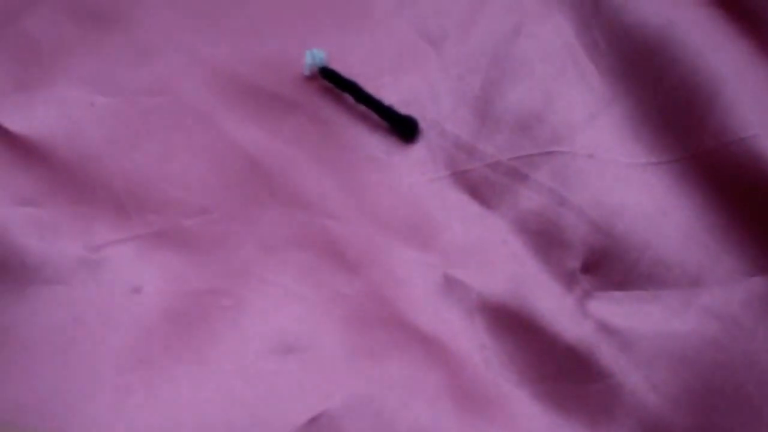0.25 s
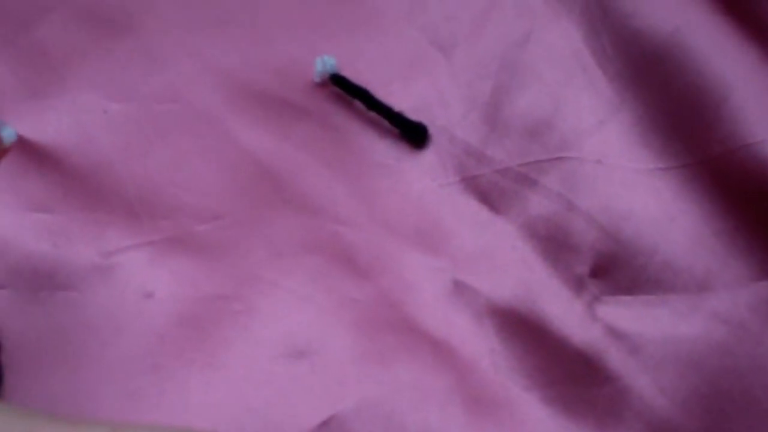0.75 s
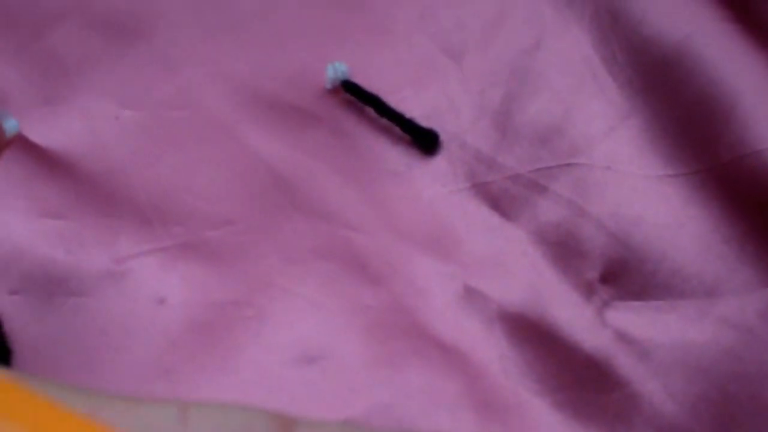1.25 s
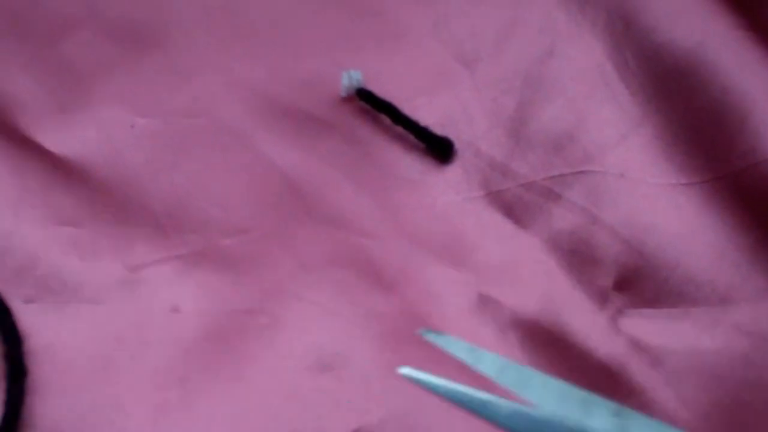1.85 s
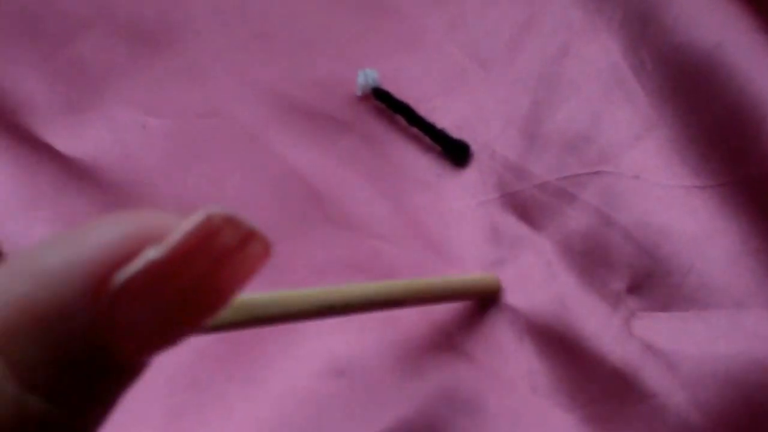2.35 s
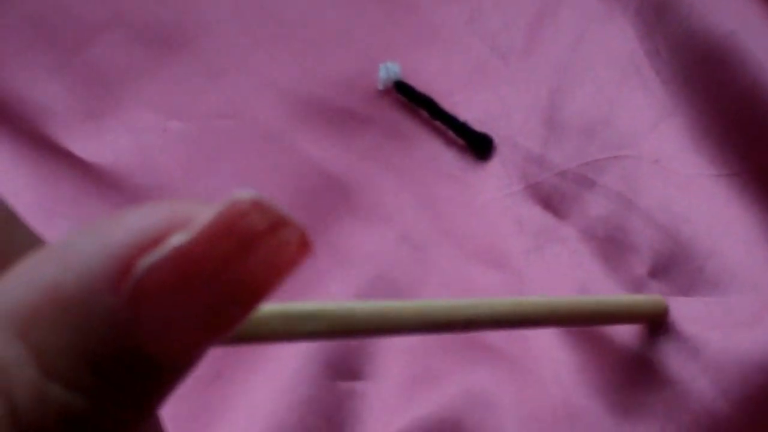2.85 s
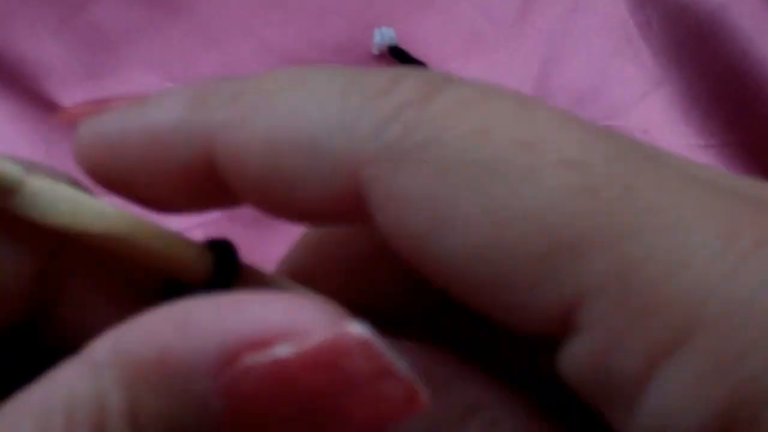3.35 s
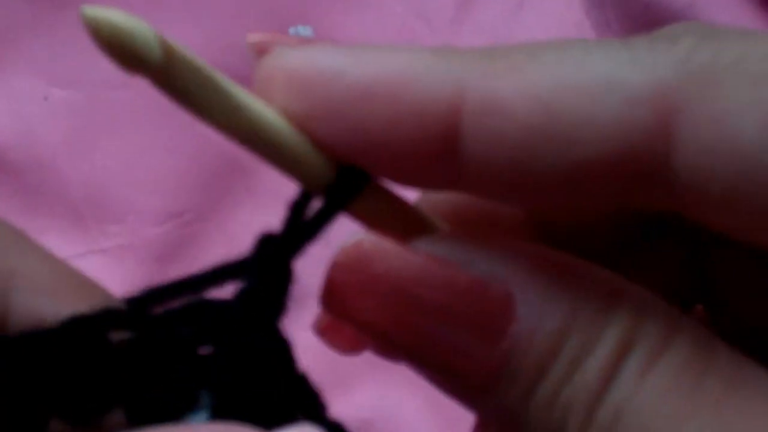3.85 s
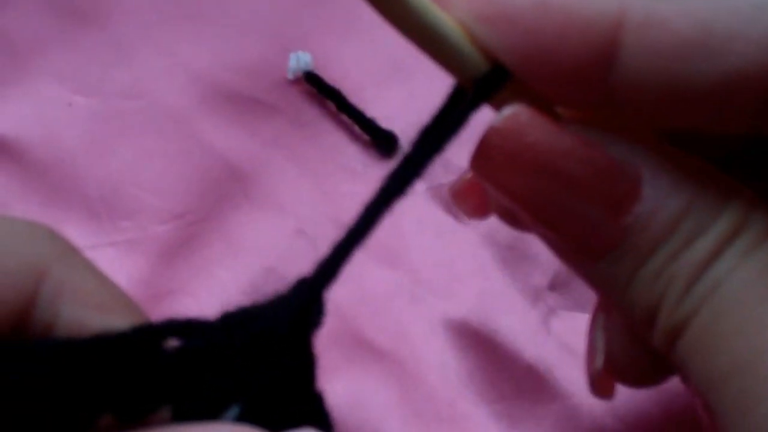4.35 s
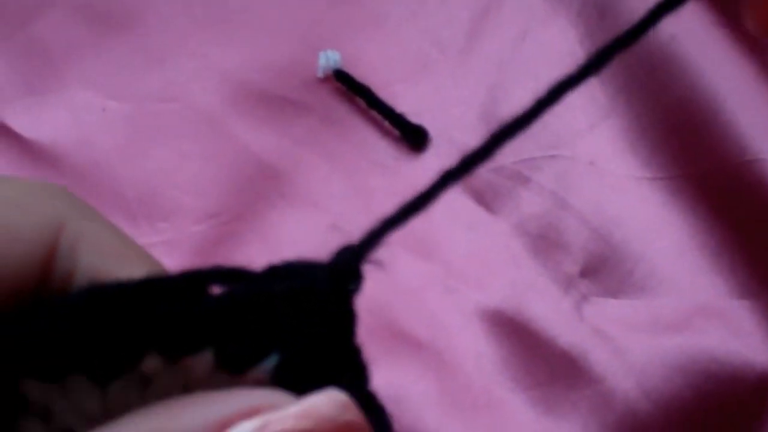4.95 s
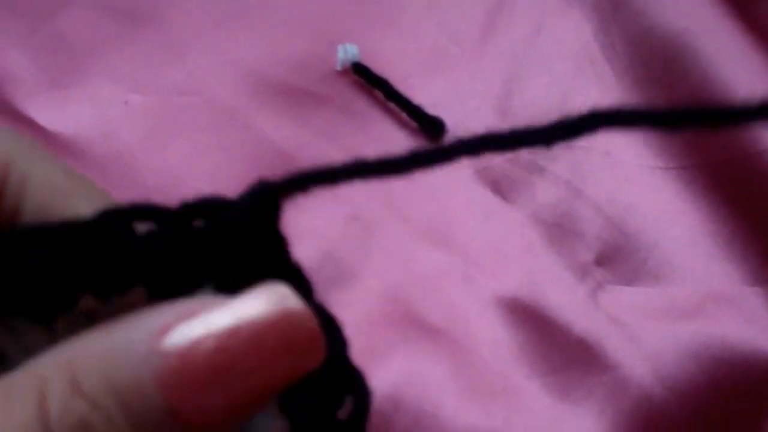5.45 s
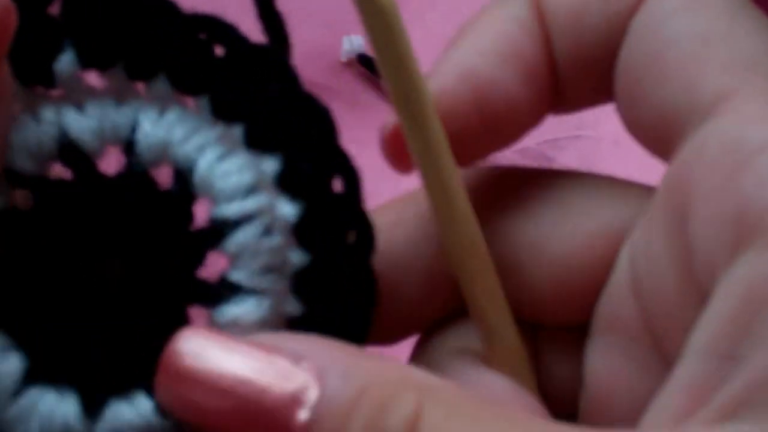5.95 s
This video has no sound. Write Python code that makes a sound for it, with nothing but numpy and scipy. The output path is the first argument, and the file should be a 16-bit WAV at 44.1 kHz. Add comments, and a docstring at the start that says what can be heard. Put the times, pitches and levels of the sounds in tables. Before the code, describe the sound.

Crisp close snips and a brief metallic scrape, followed by light wooden and fingernail ticks, soft yarn rustling, and a faint distant machine hum.

```python
"""Scissors, yarn and a wooden hook

Small scissors click, scrape and snip yarn close to two microphones, then a hook and fingernails tick: decaying
modes excited by contact noise. Soft noise swells in patches: hands and yarn on cloth, and room tails of snips.
A far machine hums in the room: filtered noise with fuzzy lines, under the hiss of the microphones.
The left microphone is half covered and much weaker."""
import sys
import numpy as np
from scipy import signal
from scipy.fft import rfft, irfft
from scipy.io import wavfile
from scipy.ndimage import uniform_filter1d

SR = 44100
rng = np.random.default_rng(int(sys.argv[2]) if len(sys.argv) > 2 else 0)


def file_out(sig):
    """Save sig as 16-bit WAV at sys.argv[1]."""
    # one column per channel
    cols = np.atleast_2d(sig).T
    # limit, then scale
    lim = np.clip(cols, -1, 1)
    pcm = np.round(lim * 32767).astype(np.int16)
    wavfile.write(sys.argv[1], SR, pcm)


N = 273420  # length in samples


def gain_of(db):
    """Level definition: an amplitude factor of ten is 20 dB."""
    return 10 ** (np.asarray(db) / 20)


def evened(x):
    """Normalisation to unit RMS."""
    return x / np.sqrt(np.mean(x ** 2) + 1e-20)


def read(points, hz):
    """Interpolation of a curve along logarithmic frequency."""
    f, value = np.transpose(points)
    return np.interp(np.log(hz + 1), np.log(f + 1), value)


def add(mix, s, sound):
    """Superposition: a sound joins the mix from time s, cut at the end."""
    part = mix[round(s * SR):][:len(sound)]
    part += sound[:len(part)]


def coloured(x, points, lead_s=0):
    """Linear filtering: a spectrum in dB scales each frequency; a linear phase gives a time lead."""
    hz = np.fft.rfftfreq(x.shape[-1], 1 / SR)
    response = gain_of(read(points, hz)) * np.exp(2j * np.pi * hz * lead_s)
    return irfft(rfft(x) * response, x.shape[-1])


# swells of soft noise: brushes over cloth, and the room's tail after snips at .25, .46 and .87 s:
# (loudest [s], rise [s], fall [s], level [dB], brightness [dB per octave])
SWELLS = [(.25, .04, 0.14, -61, -2), (.46, .04, 0.074, -60.5, 0), (.63, 0.09, 0.11, -64.5, -3.5),
          (.87, 0.054, 0.066, -62, 5.5), (1.35, 0.25, 0.051, -63.5, -3.5), (1.5, 0.037, 0.062, -73, -3),
          (1.64, 0.066, 0.14, -64, 5.5), (1.81, .1, 0.059, -58.5, 0), (1.88, .03, 0.027, -61, 2),
          (2.141, 0.15, 0.093, -56.5, 0), (2.3, 0.11, 0.12, -69.5, -2.5), (2.42, 0.055, 0.13, -54.5, -1),
          (2.53, .06, 0.09, -53, -1.2), (2.71, 0.15, 0.061, -58.5, 0), (2.9, 0.11, 0.14, -56, -1),
          (3.41, 0.098, 0.1, -60, 1.5), (3.67, 0.11, 0.24, -67.5, .8), (4.17, .2, 0.18, -65.5, -1),
          (4.43, 0.043, .1, -60, 1), (4.58, 0.099, 0.11, -57, -0.5), (5.38, 0.13, 0.046, -61.5, 2.5),
          (5.57, 0.12, 0.32, -67.5, 0), (5.85, 0.082, 0.11, -61.5, -0.5), (6.04, .07, 0.12, -61.5, 2),
          (6.2, 0.066, .05, -58, 2)]
REST_DB, REST_TILT_DB = -73.5, -1.5  # faint rustle between swells: level, brightness per octave


def swelling(t):
    """Linear envelopes superpose; brightness is the level-weighted mean of the swells sounding."""
    s, rise, fall, db, tilt = np.transpose(SWELLS)[:, :, None]
    triangle = np.minimum(1 + (t - s) / rise, 1 - (t - s) / fall)
    swell = gain_of(db) * np.clip(triangle, 0, 1)
    level = gain_of(REST_DB) + swell.sum(0)
    tilt_sum = gain_of(REST_DB) * REST_TILT_DB + (swell * tilt).sum(0)
    return level, tilt_sum / level


# relative spectrum of the rustle, closed above 14.2 kHz: (frequency [Hz], density [dB per Hz])
RUSTLE_SPECTRUM = [(470, -38), (800, 0.5), (1300, -2), (2100, 0), (4000, -0.5), (6000, -1), (9000, 0),
                   (13500, 5.5), (14200, 8), (14400, -46)]
PATCH_DB, FLICKER_DB = 2.44, 2.1  # RMS unevenness over time and frequency; over time alone


def rustle():
    """Modulated noise: patches and brief flickers, as of fibres that catch and let go, under slow swells."""
    frames, hz = N // 64 + 5, np.fft.rfftfreq(256, 1 / SR)
    real, imaginary, patches = rng.standard_normal((frames, 129, 3)).T
    patches = uniform_filter1d(patches, size=12, axis=0)
    patches = evened(uniform_filter1d(patches, size=30, axis=1))
    flicker = evened(uniform_filter1d(rng.standard_normal(frames), size=4))
    swell, tilt = swelling(np.arange(frames) * 64 / SR)
    shape_db = read(RUSTLE_SPECTRUM, hz)[:, None] + PATCH_DB * patches + FLICKER_DB * flicker
    octaves = np.log2((hz[:, None] + 100) / 6000)
    grains = (real + 1j * imaginary) * gain_of(shape_db)
    steady = signal.istft(grains, nperseg=256, noverlap=192)[1]
    # unit RMS is set before the swells shape level and brightness
    grains *= swell * gain_of(tilt * octaves) / np.sqrt(np.mean(steady ** 2))
    return signal.istft(grains, nperseg=256, noverlap=192)[1][:N]


# relative spectrum of the low wash: (frequency [Hz], density [dB per Hz])
WASH_SPECTRUM = [(18, -57), (30, -16), (92, -5.5), (151, -1.5), (206, -4), (270, 0.5), (321, -2.5),
                 (445, -2.5), (540, -8), (707, -10), (857, -9.5), (1240, -14), (3000, -21.5), (3900, -23.5),
                 (6600, -120)]
WASH_DB = -63  # RMS
# fuzzy lines of hum: (centre [Hz], full width at half amplitude [Hz], RMS level [dB])
HUM_LINES = [(160, 24, -76), (277.3, 5.9, -71), (324, 8.8, -74.5), (378.3, 12, -76.5), (462, 36, -75.5),
             (846, 17, -82.5)]


def room_tone():
    """Broadband and narrowband noise: the low wash of a far machine with a few fuzzy lines of hum."""
    hz = np.fft.rfftfreq(N, 1 / SR)
    out = gain_of(WASH_DB) * evened(coloured(rng.standard_normal(N), WASH_SPECTRUM))
    for centre, width, db in HUM_LINES:
        resonance = 1 / (1 + (2 * (hz - centre) / width) ** 2)
        line = irfft(rfft(rng.standard_normal(N)) * resonance, N)
        out += gain_of(db) * evened(line)
    return out


# upper edges of the first four of five mode groups: (frequency [Hz])
# on the scissors the groups are handles, pivot, blade body, blade ends, tips
GROUP_EDGES = (2400, 4000, 8500, 12000)


def body(modes, shares_db, spot_hz, stretch):
    """Modal superposition: where a struck thing is held and hit sets the share of each decaying mode."""
    hz, db, t60 = np.transpose(modes)[:, :, None]
    t = np.arange(1500) / SR
    share_db = np.asarray(shares_db)[np.searchsorted(GROUP_EDGES, hz)]
    near_db = 9 * np.exp(-(np.log(hz / spot_hz) / 0.096) ** 2)  # modes near the struck spot's are stronger
    side = (-1.) ** np.arange(len(hz))[:, None]  # neighbours in the table swing in opposite senses
    decay_db = 60 * t / (t60 * stretch)
    ringing = gain_of(db + share_db + near_db - decay_db) * np.sin(2 * np.pi * hz * t)
    return (side * ringing).sum(0)


# modes of the scissors: (frequency [Hz], level [dB], 60 dB decay time before stretching [s])
SCISSORS_MODES = [(1160, -6.5, 0.0069), (1660, -4.5, 0.0034), (2130, -1.5, 0.0081), (2410, -2.5, 0.0037),
                  (2823, 1.5, 0.007), (3330, -4.5, 0.011), (4100, -5, 0.0069), (4970, -10, 0.016),
                  (5490, -5.5, 0.011), (6240, -6.5, 0.0061), (6800, -6, 0.01), (7500, -2.5, 0.0047),
                  (8300, -1, 0.0036), (9900, -9.5, 0.012), (10470, -2, 0.0078), (11975, 3, 0.0046),
                  (11680, -6, 0.009), (13300, 4.5, 0.0063), (13840, -8, 0.0032)]
# short bursts of scissors-coloured noise; the first is a faint hiss leading into the snip:
# (start [s], level bend [s], end [s], reference level [dB], start under it [dB], end against it [dB],
# share of pivot [dB], share of tips [dB])
SCRAPES = [(.200, 0.2045, .204, -27, -18, 1, -13, -2), (0.597, .61, .64, -67, -6, -7, -8, 3),
           (.643, 0.65, .67, -47.5, -11, -26, -4.5, 2), (0.845, .852, .862, -43, -2, -17, -4.5, -5),
           (1.172, 1.18, 1.19, -64, -8, -12, 3, 8), (1.199, 1.219, 1.229, -55, -8, -12, 3.5, 8),
           (1.257, 1.269, 1.296, -46.5, -9, -7.5, -1.5, 3), (1.296, 1.316, 1.331, -33, -16, -1, -5, -0.5),
           (1.468, 1.477, 1.497, -49.5, -16, -11.5, 0, 2)]
SLIP_DB = 2.8  # RMS unevenness of a burst


def scrape(start, bend, end, level_db, start_db, end_db, pivot_db, tips_db):
    """Noise-driven resonance: dense uneven micro-impulses ring each group of scissors modes."""
    t = np.arange(start, end, 1 / SR)
    db = level_db + np.interp(t, (start, bend, end), (start_db, 0, end_db))
    slips = evened(uniform_filter1d(rng.standard_normal(len(t)), size=50))
    grit = evened(rng.standard_normal(len(t)) * gain_of(SLIP_DB * slips)) * gain_of(db)
    out = 0
    for group, share_db in enumerate((pivot_db - 15, pivot_db, -6.5, tips_db - 6.0, tips_db)):
        one_group = np.where(np.arange(5) == group, 0, -200)
        ring = body(SCISSORS_MODES, one_group, 6280, 0.85)
        out = out + np.convolve(grit * gain_of(share_db), ring / np.linalg.norm(ring))
    return start, out


CHATTER_SHARE, CHATTER_S = .12, .0006  # small contacts around each blow: size, time constant


def blows(table, modes, lowest_db, upper_db):
    """Impact excitation: a graze, one sharp contact and a short chatter of smaller ones ring the modes."""
    out = np.zeros(N)
    t = np.arange(200) / SR - .0007  # the sharp contact is at zero
    noises = rng.standard_normal((len(table), 200))
    for (s, db, low_db, top_db, spot_hz, stretch), noise in zip(table, noises):
        contact = CHATTER_SHARE * noise * np.exp(-abs(t) / CHATTER_S)
        contact[np.argmin(abs(t))] = 1
        shares_db = (low_db + lowest_db, low_db, 0, top_db / 2 + upper_db, top_db)
        sound = np.convolve(contact, body(modes, shares_db, spot_hz, stretch))
        add(out, s, gain_of(db) * sound / abs(sound).max())
    return out


# blade and handle clicks: (time [s], peak [dB], share of handles and pivot [dB], share of tips [dB],
# mode nearest the struck spot [Hz], ring time [factor])
SNIPS = [(.2046, -12.5, -8, 3, 4100, 0.58), (.2058, -8, 6.5, -6.5, 2100, 0.32),
         (.2339, -7.5, 4.5, -5.5, 7500, 0.41), (.4377, -23, -7, 3, 5070, 1.3),
         (.476, -42, -1, 2, 5470, 1.1), (.4857, -44, -8, 12, 10400, .8), (.6722, -41.5, -2, -1, 10400, .8),
         (.7088, -39.5, 3.5, -8, 4840, 0.54), (.7617, -42.5, 0, 3, 5900, .7),
         (.843, -11, 4, 18, 6140, 1.06), (1.0158, -41.5, -4, -13, 4180, .6),
         (1.0882, -46, 7, -5, 4730, 0.62), (1.1463, -44.5, 6, 5, 4880, .86), (1.3033, -28, 6, 4, 5770, .48),
         (1.3513, -27.5, -4, -10, 7140, 0.38), (1.6259, -34, -6, 11, 10500, 0.65),
         (1.8262, -37.5, -5, -2, 5440, 1.5), (1.8639, -40, -6, 8, 10400, .7),
         (1.8817, -38, -12, -3, 5400, 1.3), (1.9195, -41.5, -15, -19, 5590, 1.4)]
ENDS_DB = -2  # blade ends against the mean of body and tips


def snips():
    """Impact of blades and handles: clicks with the handles 11 dB under the pivot."""
    return blows(SNIPS, SCISSORS_MODES, -11, ENDS_DB)


# the plastic handles knock as the blades shut: (time [s], peak [dB], share of pivot [dB],
# share of tips [dB], mode nearest the struck spot [Hz], ring time [factor])
KNOCKS = [(.4385, -52, 0, -10, 1180, 3), (.478, -54, 0, -10, 1190, 3), (.851, -45, 0, -10, 1200, 4.6),
          (1.323, -45, 0, -10, 1160, 2.5)]


def knocks():
    """Low-mode excitation: dull knocks, the handles 22 dB over the pivot."""
    return blows(KNOCKS, SCISSORS_MODES, 22, ENDS_DB)


# hook and fingernails tick: (time [s], peak [dB], share of low modes [dB], share of top modes [dB],
# mode nearest the struck spot [Hz], ring time [factor])
TICKS = [(2.2154, -18.5, -11, -4.5, 6050, 0.53), (2.2463, -32.5, -7, 0, 7120, .87),
         (2.407, -41, 1, -3, 4270, .58), (2.5057, -40, -15, -11, 6600, .58),
         (2.5203, -31, -2, -2, 6800, .6), (2.5222, -33, -10, 0, 6800, .4),
         (2.5282, -27, -2, -8.5, 6840, 0.32), (2.534, -28, -3, 0, 7050, .38),
         (2.5494, -34, -1, -6, 4710, 0.71), (2.5959, -28.5, -17, -3, 8300, 0.54),
         (2.8861, -28, -5, -10, 5830, 0.93), (2.8906, -15.5, -10.5, 2.5, 2000, 1),
         (2.926, -29.5, 0, -3, 6500, .9), (2.9625, -29, -5, -10, 5000, 0.9),
         (2.9814, -43, -1, -11, 4720, .7), (5.8391, -38, -9, -13, 4600, .56)]
# modes of the hook: (frequency [Hz], level [dB], 60 dB decay time before stretching [s])
HOOK_MODES = [(1090, -2, 0.017), (1470, -1, 0.0066), (2000, -0.5, 0.021), (3230, 0, 0.021),
              (3840, 2, 0.023), (5010, -2.5, 0.0076), (6020, -1.5, 0.0053), (7320, 0, 0.0042),
              (8210, -6, 0.017), (9470, 12, 0.0029), (10300, 7.5, 0.01), (11630, 11, 0.0061),
              (12500, 1, .006), (13480, 12.5, 0.013), (14200, -10, 0.0071)]


def ticks():
    """Impact on a small damped body: the hook's modes ring briefly under each tick."""
    # lowest group under the low modes; fourth group against the mean of middle and top
    return blows(TICKS, HOOK_MODES, -1, 1.5)


EARLY_S = 0.0022  # time constant of the close reflections


def hands(x):
    """Early reflection: a few milliseconds off hands and table, different at each microphone."""
    t = np.arange(600) / SR
    taps = rng.standard_normal((2, 600)) * np.exp(-t / EARLY_S) * (t > .0004)
    taps /= np.linalg.norm(taps, axis=1, keepdims=True)
    return signal.oaconvolve(x[None], taps, axes=1)[:, :N]


# reverberation of the room: (frequency [Hz], 60 dB decay time [s])
ROOM_DECAY = [(300, 0.083), (2000, 0.11), (8000, 0.18), (14000, 0.16)]


def room(x):
    """Reverberant decay: sparse taps of random sign, each band dying at its own speed, a set per microphone."""
    taps = np.zeros((2, 16000))
    at = np.arange(80, 15960, 20) + rng.integers(0, 20, (2, 794))
    np.put_along_axis(taps, at, rng.choice([-1., 1.], at.shape), 1)
    hz, t, bands = signal.stft(taps, SR, nperseg=128)
    fade = gain_of(-60 * t / read(ROOM_DECAY, hz)[:, None])
    tail = signal.istft(bands * fade, SR, nperseg=128)[1]
    return signal.fftconvolve(x[None], tail / np.linalg.norm(tail[0]), axes=1)[:, :N]


# small things radiate little bass: (frequency [Hz], gain [dB])
SMALL_RADIATOR = [(100, -10), (500, -11), (1000, -0.5)]
# close reflections at the left and right microphones: (level [dB])
EARLY_LEVELS = [
    [-3],
    [-17],
]


def scene():
    """Superposition of direct sound, early reflections, reverberation and the far machine."""
    struck = snips() + ticks() + knocks()
    for row in SCRAPES:
        add(struck, *scrape(*row))
    near = coloured(struck, SMALL_RADIATOR) + rustle()
    # part of the wash differs at the left microphone
    far = room_tone() + gain_of([[-2.5], [-60]]) * room_tone()
    reflected = gain_of(EARLY_LEVELS) * hands(near)
    reverberant = gain_of([[-14], [-24]]) * room(near)
    return near + reflected + reverberant + far


# response of the half-covered left microphone: (frequency [Hz], gain on the sound arriving [dB])
LEFT_COVER = [(60, -17), (110, -22), (200, -16), (380, -18.5), (700, -20), (1290, -20), (2380, -19.5),
              (4400, -17), (8120, -14.5), (15000, -24)]
# relative spectrum of microphone hiss: (frequency [Hz], density [dB per Hz])
HISS_SPECTRUM = [(20, 4), (80, 2), (300, -0.5), (1500, -8), (4000, -5), (9000, -5.5), (13500, -3),
                 (14150, -2), (14350, -52)]
# hiss at left and right, before the treble roll-off: (level [dB])
HISS_LEVELS = [
    [-67.5],
    [-61],
]
# treble roll-off: (frequency [Hz], gain [dB])
TREBLE_ROLLOFF = [(14100, 0), (14500, -18), (15200, -16), (16400, -30)]
LEFT_LEAD_S, BOTH_DB = .000025, 4.5  # time lead at the left; gain common to both microphones
EDGE_HZ = 16500  # band limit


def record(dry):
    """Transducer response: the covered left microphone, the hiss of both, treble roll-off and band limit."""
    left = coloured(dry[0], LEFT_COVER, LEFT_LEAD_S)
    heard = gain_of(BOTH_DB) * np.array([left, dry[1]])
    hiss = evened(coloured(rng.standard_normal((2, N)), HISS_SPECTRUM))
    heard = coloured(heard + gain_of(HISS_LEVELS) * hiss, TREBLE_ROLLOFF)
    lowpass = signal.firwin(511, EDGE_HZ, window=("kaiser", 9), fs=SR)
    return signal.oaconvolve(heard, lowpass[None], "same")


dry = scene()
out = record(dry)
file_out(out)
```